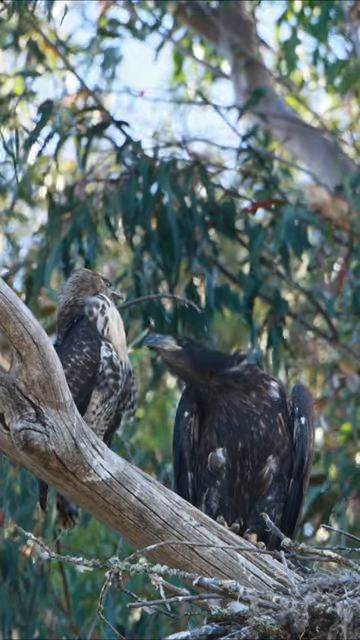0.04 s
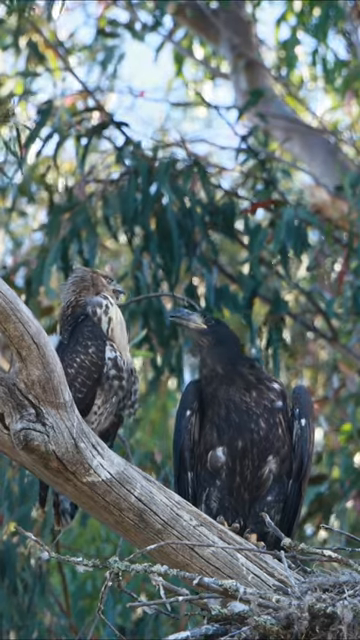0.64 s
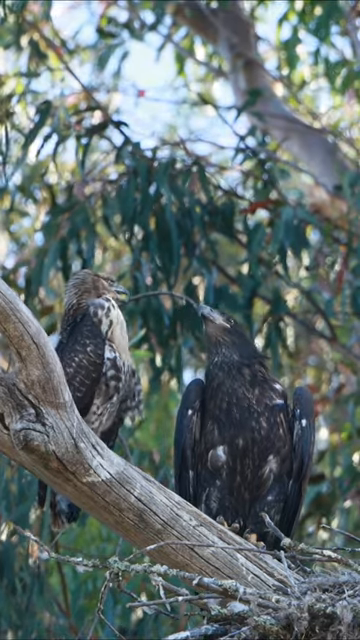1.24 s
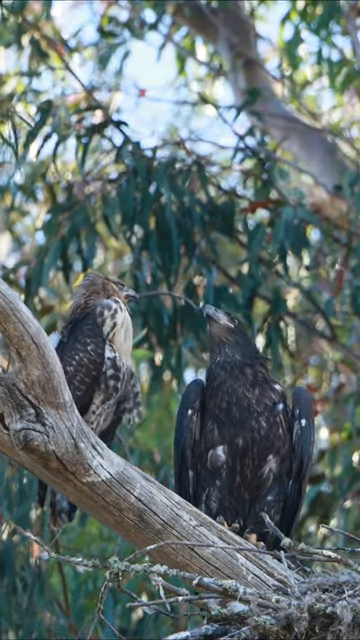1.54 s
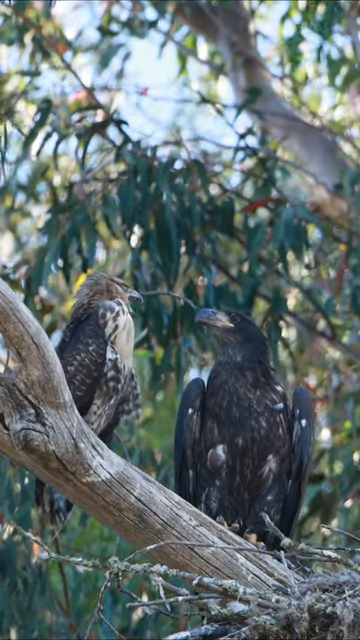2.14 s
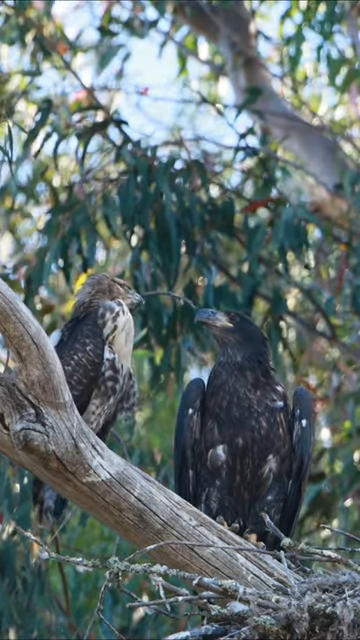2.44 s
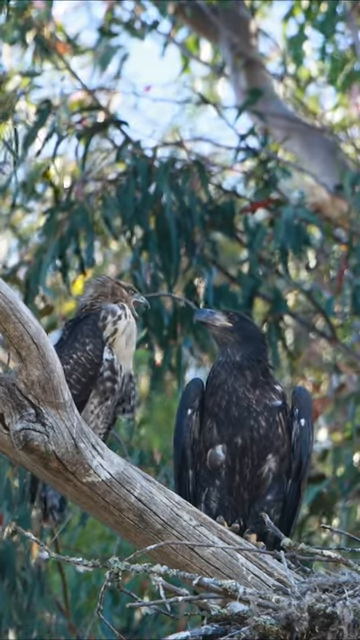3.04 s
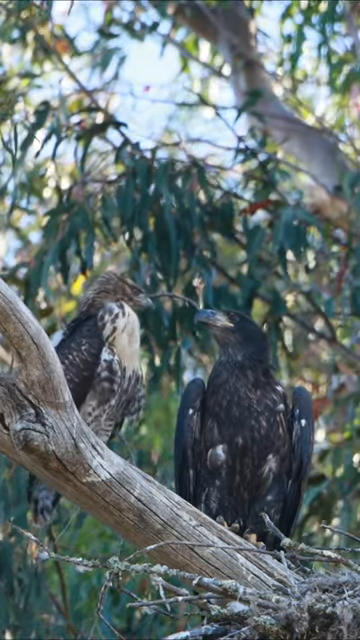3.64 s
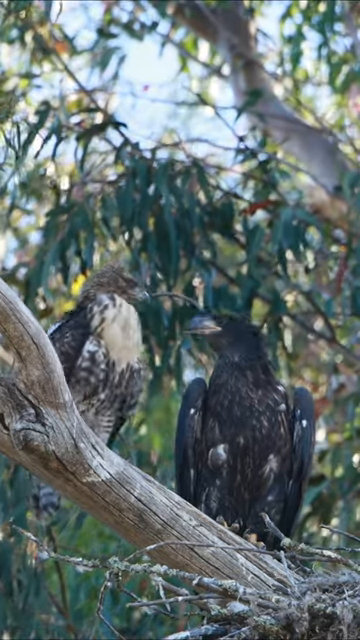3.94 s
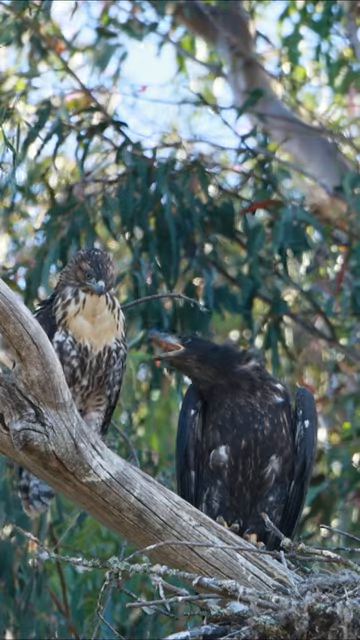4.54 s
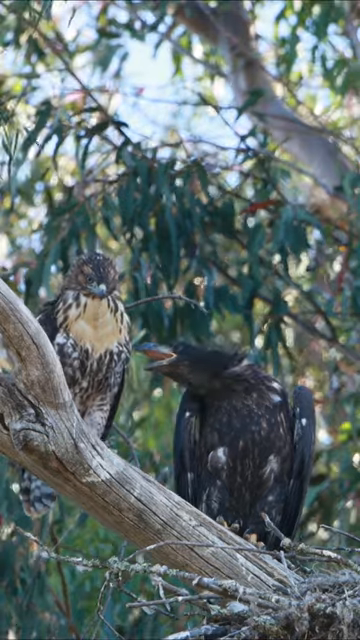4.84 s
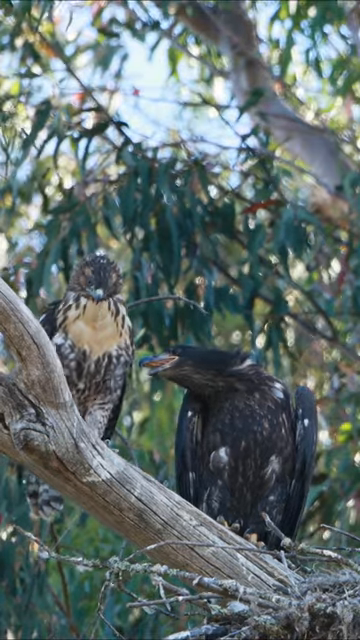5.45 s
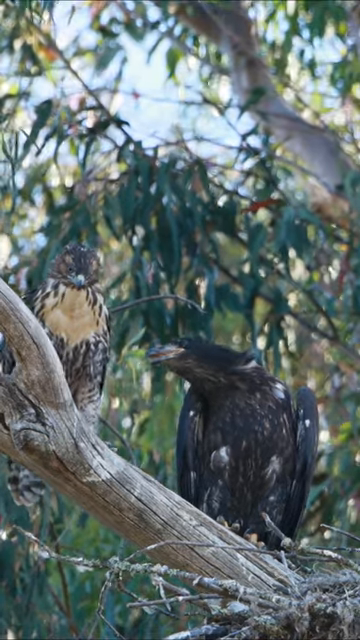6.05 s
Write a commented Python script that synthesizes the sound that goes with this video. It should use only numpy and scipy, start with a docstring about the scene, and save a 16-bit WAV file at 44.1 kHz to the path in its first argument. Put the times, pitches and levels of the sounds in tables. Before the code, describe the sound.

A young bird of prey begs from its nest in a grove, giving five short whistles at about 0.2, 0.9, 1.6, 2.3 and 3.0 seconds. Each starts low, jumps into a slightly raspy rising and falling arch, and ends low. They grow louder and a little higher, and are the most prominent sound. Between 0.2 and 2.4 seconds a thinner, higher whistle answers five times from further off, each one climbing and levelling out. A small bird lisps very faintly in the canopy during the first 1.6 seconds. A songbird adds scattered short notes, thickening into quick, slurred chatter from about 4 seconds and easing towards the end at 6.3 seconds. Trunks and leaves give every call a short, scattered echo. Throughout, distant traffic rumbles quietly, slightly to the left, with a faint machine whine and a soft, even hiss of air.

```python
'''A young bird of prey begs from its nest in a grove: five arched whistles, each with a low start and end.
A thinner, higher whistle answers from further off. A songbird chatters, mostly in the second half,
and a small bird lisps faintly in the canopy. Trunks and leaves scatter every call.
Distant traffic rumbles under a faint machine whine and a soft hiss of air.'''
import sys
import numpy as np
from scipy import signal
from scipy.fft import rfft, irfft
from scipy.io import wavfile
from scipy.ndimage import uniform_filter1d

SR = 44100
rng = np.random.default_rng(int(sys.argv[2]) if len(sys.argv) > 2 else 0)


def wrap_up_sound(samples):
    """Save the sound to the file named by the first command line argument, as 16-bit audio."""
    columns = np.atleast_2d(samples).T
    # keep every value between -1 and 1, then stretch to whole-number steps
    tamed = np.clip(columns, -1, 1)
    steps = np.round(tamed * 32767).astype(np.int16)
    wavfile.write(sys.argv[1], SR, steps)


N = 278271
TIME = np.arange(N) / SR


def undb(db):
    """Decibels to gain."""
    return 10 ** (np.asarray(db) / 20)


def unit(x):
    """Scale to rms 1."""
    return x / np.sqrt(np.mean(x ** 2))


def place(x, left_db):
    """Pan left by a level difference."""
    return x * undb(np.array([[left_db], [-left_db]]) / 2)


def walk(rate_hz):
    """Smooth random motion, rms 1, up to about rate_hz."""
    f = np.arange(N // 2 + 1) * SR / N
    return unit(irfft(rfft(rng.standard_normal(N)) * np.exp(-(f / rate_hz) ** 2), N))


# left-right likeness: f/Hz, correlation
COHERENCE = [(60, .99), (250, .96), (500, .65), (1000, .15), (3000, 0)]

def stereo_noise(spectrum):
    """Shaped noise, rms 1, alike left and right only in the bass."""
    log_f = np.log(np.arange(N // 2 + 1) * SR / N + 1)
    hz, db = np.transpose(spectrum)
    gain = undb(np.interp(log_f, np.log(hz), db, left=-80, right=-80))
    like_hz, like = np.transpose(COHERENCE)
    corr = np.interp(log_f, np.log(like_hz), like)
    mid, side = (irfft(rfft(rng.standard_normal(N)) * gain * np.sqrt(1 + s * corr), N) for s in (1, -1))
    return unit(np.array([mid + side, mid - side]))


# traffic spectra: f/Hz, relative density/dB
RUMBLE_SPECTRUM = [(12, -84), (20, -24), (46, -9), (70, 2), (150, -7.5), (200, -63), (330, -120)]
DRONE_SPECTRUM = [(82, -37), (140, -2), (238, 2), (299, -3.5), (360, -18.5), (470, -15.5), (790, -120)]
TYRE_SPECTRUM = [(330, -3.5), (480, -5), (700, -3), (1000, -4.5), (1500, -14)]
# traffic envelopes: t/s, level/dB
RUMBLE_ENVELOPE = [(0.0, -46.5), (2.26, -57), (5.51, -51.5), (6.2, -54)]
DRONE_ENVELOPE = [(0.0, -48), (0.72, -50), (0.88, -47), (1.42, -54.5), (1.46, -48), (1.65, -54.5),
                  (1.93, -49), (3.53, -61.5), (5.03, -52), (5.15, -55), (5.92, -47.5), (6.31, -53)]

def traffic(trim_db=.5):
    """Far traffic: rumble and drone swell and sink; tyres rush, mostly from the left."""
    rumble = stereo_noise(RUMBLE_SPECTRUM) * undb(trim_db + np.interp(TIME, *np.transpose(RUMBLE_ENVELOPE)))
    drone = stereo_noise(DRONE_SPECTRUM) * undb(trim_db + np.interp(TIME, *np.transpose(DRONE_ENVELOPE)))
    tyres = stereo_noise(TYRE_SPECTRUM) * undb(-64.5 + walk(.33))
    return place(rumble + drone, left_db=3) + place(tyres, left_db=9.5)


# whine spectrum: f/Hz, relative density/dB
WHINE_SPECTRUM = [(805, -50), (838, -3), (870, -19)]

def machine():
    """Faint whine of a far machine: narrowband noise."""
    return place(stereo_noise(WHINE_SPECTRUM) * undb(-71.5), left_db=9.5)


# hiss spectrum: f/Hz, relative density/dB
AIR_SPECTRUM = [(250, 6), (350, -3.5), (500, -2), (700, -6), (850, -2.5), (1200, -5.5), (1800, -8.5),
                (3000, -9), (4500, -13), (6000, -16.5), (10000, -22), (14000, -22.5), (15500, -30)]

def air():
    """Even broadband hiss."""
    return place(stereo_noise(AIR_SPECTRUM) * undb(-57), left_db=2.5)


def grove(x, near_db, tail_db, near_s=.025, left_lag_s=0, path_sets=3, t60_s=.89):
    """Direct sound, quick reflections off branches, long scatter from trunks and leaves."""
    t = TIME[:SR]
    branches = rng.standard_normal((2, SR)) * np.exp(-t / near_s) * (t > .002)
    near = undb(near_db) * unit(branches) / np.sqrt(SR)
    near[0, round(left_lag_s * SR)] += 1
    near[1, 0] += 1
    out = signal.fftconvolve(x[None], near, axes=1)[:, :N]
    fade = undb(-60 * t / t60_s) * (1 - np.exp(-t / .02))
    # foliage stirs: far paths fade in and out, the tail flutters
    for _ in range(path_sets):
        tail = undb(tail_db) * unit(rng.standard_normal((2, SR)) ** 3 * fade) / np.sqrt(path_sets * SR)
        out += walk(18) * signal.fftconvolve(x[None], tail, axes=1)[:, :N]
    return out


# high lisps: t/s, length/s, f/Hz, level/dB
LISP_NOTES = [(0.37, 0.086, 7400, -69.5), (0.458, 0.015, 8700, -60.5), (.84, 0.096, 7580, -67),
              (1.474, 0.1, 6200, -69.5)]

def canopy_bird(width_hz=450):
    """A small bird's hissy lisps: high tones spread into noise bands."""
    out = 0
    for start, length, hz, db in LISP_NOTES:
        swell = np.sin(np.pi * np.clip((TIME - start) / length, 0, 1))
        out = out + undb(db) * swell * np.sin(2 * np.pi * hz * TIME)
    return place(grove(out * walk(width_hz), near_db=-2, tail_db=2, near_s=.016), left_db=1)


# twitter spells: start/s, end/s, rate/(notes/s), f/Hz, level/dB
TWITTER_SPELLS = [(0, 0.118, 17.3, 4110, -61), (0.49, .55, 30, 4240, -59), (3.769, 3.93, 26, 4560, -59.5),
                  (4.171, 4.311, 21, 3740, -58.5), (5.949, 6.3, 11.8, 3220, -61.5)]

def twitter(length_s=.03):
    """Faint, loosely spaced, mostly falling notes; rows as in SLURRED_NOTES."""
    notes = []
    for start, end, rate, hz, db in TWITTER_SPELLS:
        chance = rng.standard_normal((16, 3))
        for t, (late, high, slide) in zip(np.arange(start, end, 1 / rate), chance):
            notes.append((t + .13 * late / rate, length_s, hz * (1 + .0435 * high), -450 + 345 * slide, db))
    return notes


# short slurred bird notes, songbird chatter and the falls ending the far whistles:
# t/s, length/s, mid f/Hz, slide/Hz, level/dB
SLURRED_NOTES = [ (0, 0.022, 2640, -220, -55.5), (0.417, 0.059, 4420, -600, -57.5),
                 (.785, .042, 4030, -480, -59), (1.011, 0.077, 4330, 456, -57.5),
                 (1.444, 0.039, 4260, -600, -57.5), (1.906, 0.046, 4110, -800, -54),
                 (1.966, 0.051, 1870, -60, -61), (2.438, 0.054, 1860, 0, -63),
                 (3.475, 0.084, 3320, -5, -59.5), (3.577, 0.082, 4210, -600, -59.5),
                 (3.654, 0.113, 4090, 202, -68), (4.029, 0.048, 3590, 500, -56.5),
                 (4.076, 0.049, 2620, -450, -59), (4.189, 0.048, 3250, 300, -49.5),
                 (4.226, 0.048, 3187, -350, -49), (4.227, 0.096, 4550, -1150, -54),
                 (4.332, .11, 1726, -320, -65), (4.362, 0.019, 4810, 100, -51.5),
                 (4.388, 0.031, 3570, 998, -49.5), (4.4, 0.098, 4080, 229, -50.5),
                 (4.5, 0.078, 4040, -160, -57.5), (4.559, 0.045, 3460, -1080, -54),
                 (4.608, .056, 3254, -250, -50.5), (4.685, 0.024, 5030, -1090, -56.5),
                 (4.732, 0.024, 4780, 1350, -52), (4.749, .028, 4690, -1000, -46.5),
                 (4.873, 0.092, 3440, 230, -49), (4.925, 0.044, 2980, -1100, -55),
                 (4.964, 0.045, 2790, 500, -56), (5.017, 0.047, 4090, -51, -52.5),
                 (5.068, 0.025, 5370, -1500, -61), (5.109, 0.045, 3330, -1800, -56),
                 (5.244, 0.035, 3520, -1000, -52), (5.328, 0.028, 3480, 348, -56),
                 (5.419, 0.019, 2890, 620, -56.5), (5.466, 0.047, 3380, 450, -51.5),
                 (5.567, 0.045, 2837, 180, -54.5), (5.699, .022, 3500, -1300, -57.5),
                 (5.817, 0.054, 2696, -1.5, -57), (5.833, 0.027, 4180, -750, -59),
                 (5.984, 0.028, 3440, -1350, -58.5), (6.141, 0.028, 3350, -850, -60.5),
                 (6.167, 0.017, 4000, 450, -52.5)]

def bird_slurs(bow_hz=168.5):
    """Short slurred notes, each a bowed slide; loud high ones turn scratchy."""
    out, quaver = np.zeros(N), walk(300)
    for start, length, mid_hz, slide_hz, db in SLURRED_NOTES + twitter():
        i = np.flatnonzero((TIME >= start) & (TIME < start + length))
        u = (TIME[i] - start) / length
        strain = np.interp(mid_hz, [4100, 4600], [0, 1]) * np.interp(db, [-62, -55], [.1, 1])
        scratch = (.011 + .022 * strain) * quaver[i]
        hz = (mid_hz + slide_hz * (u - .5) - bow_hz * (2 * u - 1) ** 2) * (1 + scratch)
        out[i] += undb(db) * np.sin(np.pi * u) ** .3 * np.sin(2 * np.pi * np.cumsum(hz) / SR)
    out *= undb(2.5 + 1.5 * walk(120))
    return place(grove(out, near_db=-6, tail_db=-6, left_lag_s=.00009), left_db=4)


RAMP = np.linspace(0, 1, 24)

def stroke(start, length, hz, db):
    """One stretch of a call as evenly timed rows: t/s, f/Hz, level/dB."""
    return np.column_stack(np.broadcast_arrays(start + length * RAMP, hz, db))


def contours(calls, edge_s):
    """Pitch/Hz and gain through a series of calls, each faded in and out."""
    t, hz, db = np.concatenate(calls).T
    order = np.argsort(t)
    pitch = uniform_filter1d(np.interp(TIME, t[order], hz[order]), size=400)
    gate = sum(np.clip(np.minimum(TIME - c[0][0], c[-1][0] - TIME) / edge_s + .5, 0, 1) for c in calls)
    return pitch, gate * undb(np.interp(TIME, t[order], db[order]))


def far_call(start, rise_s, hold_s, top_hz, db, foot_hz=3670, sag_hz_per_s=600, fade_db_per_s=19):
    """A climb that levels off, then a held top that sags and fades."""
    foot, held_s = (1 - RAMP) ** 2, hold_s * RAMP
    climb = stroke(start, rise_s, top_hz + (foot_hz - top_hz) * foot, db + .5 * foot)
    hold = stroke(start + rise_s, hold_s, top_hz - sag_hz_per_s * held_s, db - fade_db_per_s * held_s)
    return np.vstack([climb, hold])


# far whistles: t/s, rise/s, hold/s, top f/Hz, level/dB
FAR_CALLS = [(0.177, 0.21, .045, 5050, -65.5), (0.719, 0.14, .05, 5050, -64),
             (1.273, 0.13, .055, 4850, -69), (1.758, 0.14, .07, 5050, -64.5),
             (2.196, 0.061, 0.15, 5293, -59.5)]

def far_whistler():
    """Thin whistle from deeper in the trees: hoarse on the climb, clearer at the top."""
    hz, gain = contours([far_call(*row) for row in FAR_CALLS], edge_s=.0033)
    hoarse = np.interp(hz, [4000, 4600, 5050], [.05, .024, .01])
    phase = 2 * np.pi * np.cumsum(hz * (1 + hoarse * walk(610))) / SR
    noise_band = undb(-8) * walk(450) * np.sin(2 * np.pi * np.cumsum(.9 * hz) / SR)
    tone = gain * (np.sin(phase) + noise_band) * undb(2.5 + 2.5 * walk(90))
    return place(grove(tone, near_db=-2, tail_db=-3, left_lag_s=.00025), left_db=-1)


def lead_in(call_start, db, length_s=.022, gap_s=.00294, from_hz=2380, to_hz=3070):
    """Quick upward chirp just before a call."""
    return stroke(call_start - gap_s - length_s, length_s, from_hz + (to_hz - from_hz) * RAMP, db)


def begging_call(start, rise_s, fall_s, top_hz, top_db, low_db):
    """Low opening, register jump into an arch loudest at its top, drop to a low close."""
    open_s, jump_s, close_s = .052, .006, .0318
    u, low_hz = RAMP, 1409 + .23 * top_hz
    crest = start + open_s + jump_s + rise_s
    squareness = .29 / rise_s  # shorter rise, flatter top
    depth_db = top_db - (low_db - 8)  # arch feet 8 dB under the low register
    foot = (1 - u) ** 2
    opening = stroke(start, open_s, low_hz + 280 * (u - .5), low_db + 1.5 * (u - .5))
    rise_hz = top_hz * (1 - .17 * (1 - u) ** squareness)
    rise = stroke(crest - rise_s, rise_s, rise_hz, top_db - depth_db * foot)
    fall = stroke(crest, fall_s, top_hz * (1 - .18 * u ** squareness), top_db - depth_db * u ** 2)
    close = stroke(crest + fall_s + jump_s, close_s, low_hz + 225.5 * (foot - .3), low_db + 4 - 12.5 * u)
    return np.vstack([opening, rise, fall, close])


# begging whistles: t/s, rise/s, fall/s, top f/Hz, top level/dB, low-register level/dB, lead-in level/dB
BEGGING_CALLS = [(0.191, 0.092, .042, 3092, -46.5, -61.5, -82),
                 (0.885, 0.1, 0.061, 3253, -43.5, -54.5, -59.5), (1.578, .132, .057, 3564, -41, -52, -72),
                 (2.293, .145, .055, 3682, -40.5, -49.5, -54), (3.035, 0.14, 0.059, 3695, -41, -49, -57.5)]

def raptor(buzz_hz=145):
    """Near-pure syrinx tone: steady atop the arch, buzzing just below, where it changes register."""
    calls = [begging_call(*row[:-1]) for row in BEGGING_CALLS]
    chirps = [lead_in(row[0], row[-1]) for row in BEGGING_CALLS]
    hz, gain = contours(calls + chirps, edge_s=.006)
    top_hz = np.interp(TIME, [c[:, 0].mean() for c in calls], [c[:, 1].max() for c in calls])
    # between registers the membranes flutter, shaking pitch and level
    rasp = np.exp(-((hz / top_hz - .84) / .08) ** 2)
    buzz = np.sin(2 * np.pi * np.cumsum(buzz_hz * (1 + .15 * walk(40))) / SR)
    shake = .003 * walk(150) + rasp * (.028 * buzz + .022 * walk(400))
    phase = 2 * np.pi * np.cumsum(hz * (1 + shake)) / SR
    # the throat passes the octave only in the low register
    octave_db = np.interp(2 * hz, [4700, 5100, 6400], [-10, -24, -48])
    tone = np.sqrt(2) * gain * (np.sin(phase) + undb(octave_db) * np.sin(2 * phase))
    tone *= undb(1.2 * walk(150) + 3 * rasp * buzz)
    return place(grove(tone, near_db=-8.5, tail_db=-7, path_sets=5), left_db=2.5)


def scene():
    """Birds over traffic, whine and hiss."""
    return raptor() + far_whistler() + bird_slurs() + canopy_bird() + traffic() + machine() + air()


def record(dry):
    """Steep low-pass at 15.7 kHz."""
    return signal.sosfilt(signal.ellip(10, .2, 70, 15700, fs=SR, output="sos"), dry)


dry = scene()
out = record(dry)
wrap_up_sound(out)
```